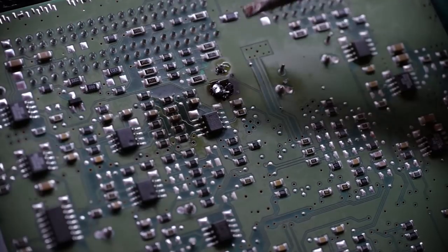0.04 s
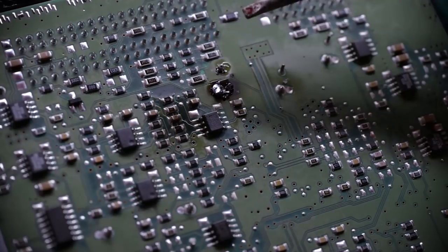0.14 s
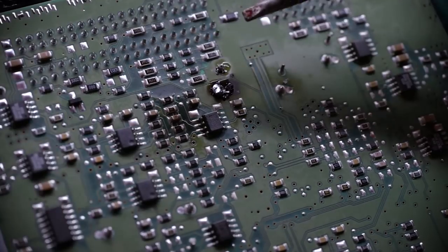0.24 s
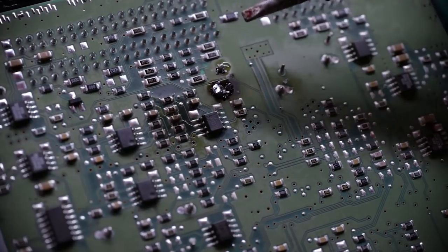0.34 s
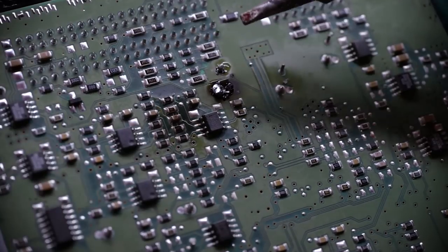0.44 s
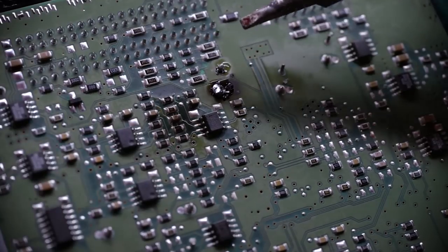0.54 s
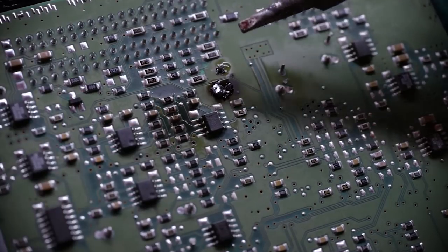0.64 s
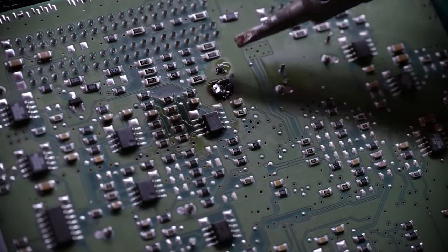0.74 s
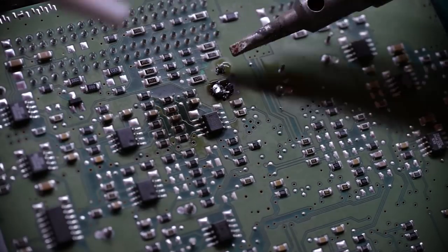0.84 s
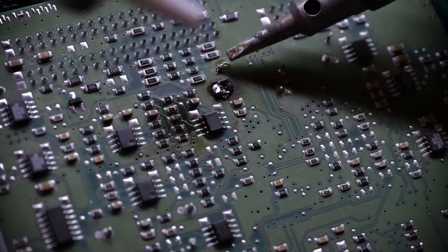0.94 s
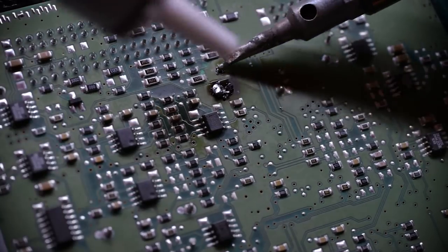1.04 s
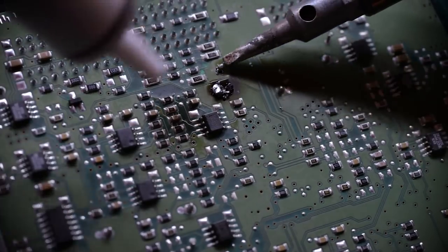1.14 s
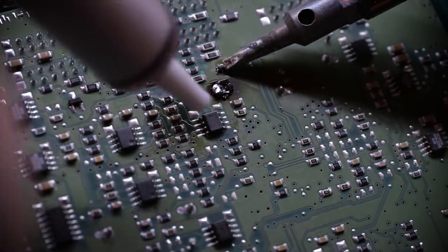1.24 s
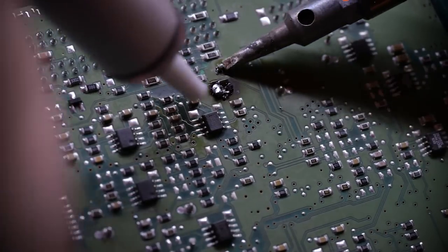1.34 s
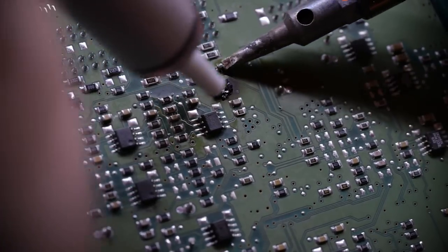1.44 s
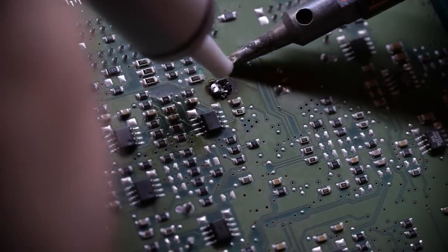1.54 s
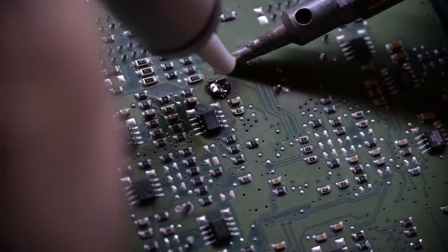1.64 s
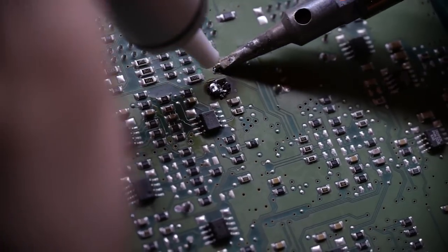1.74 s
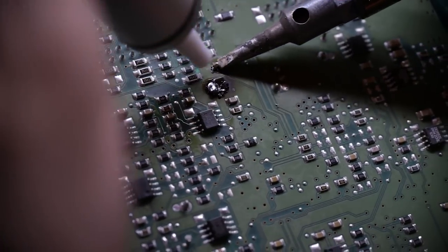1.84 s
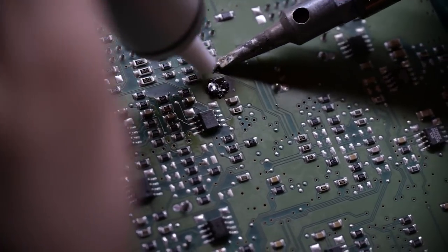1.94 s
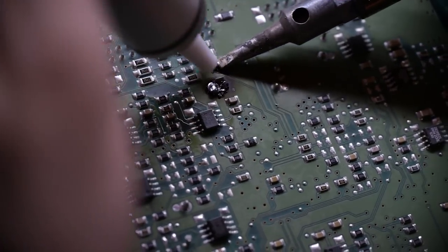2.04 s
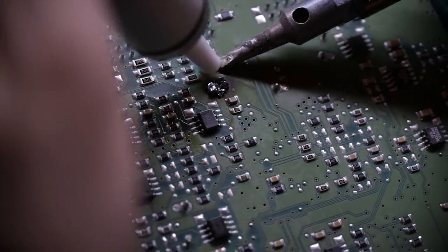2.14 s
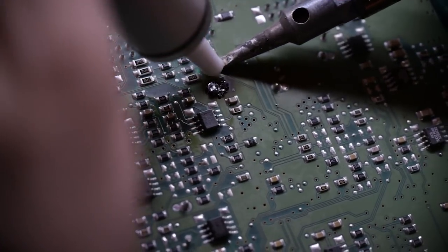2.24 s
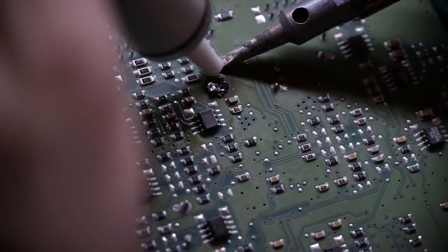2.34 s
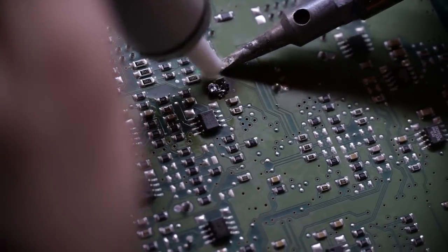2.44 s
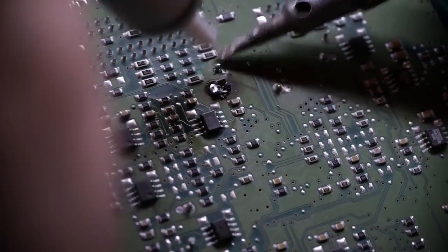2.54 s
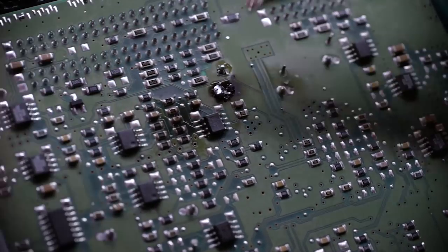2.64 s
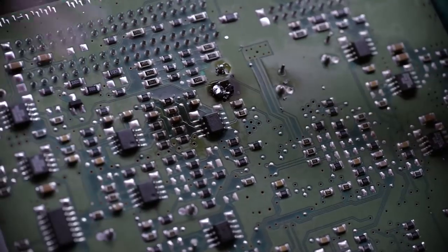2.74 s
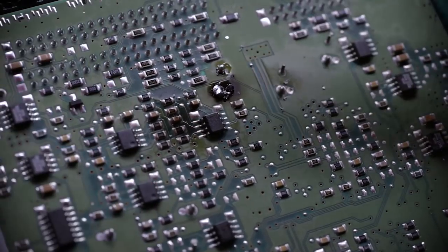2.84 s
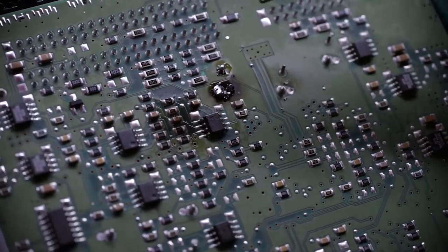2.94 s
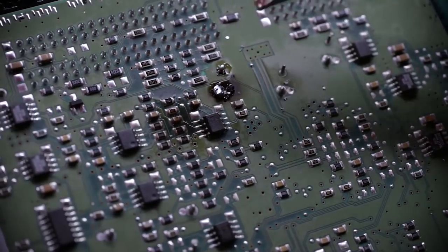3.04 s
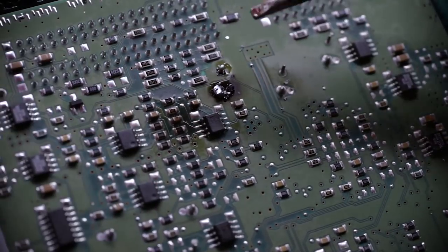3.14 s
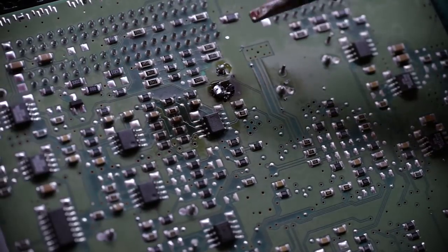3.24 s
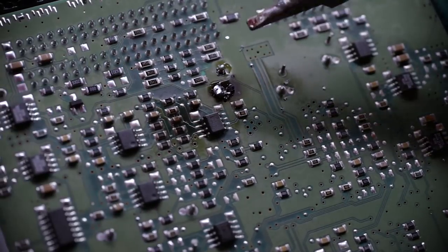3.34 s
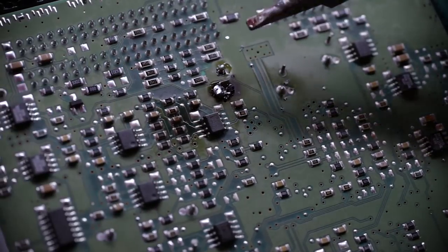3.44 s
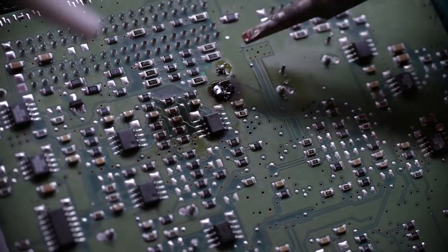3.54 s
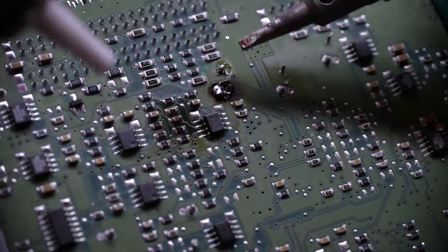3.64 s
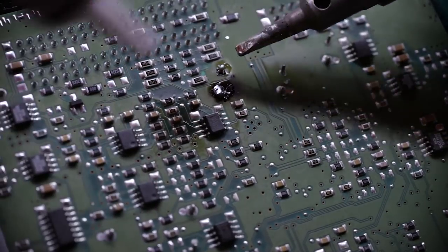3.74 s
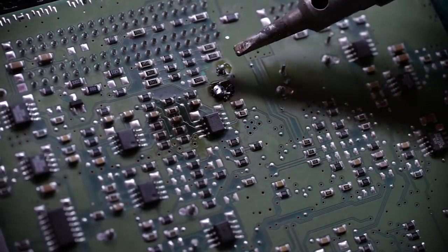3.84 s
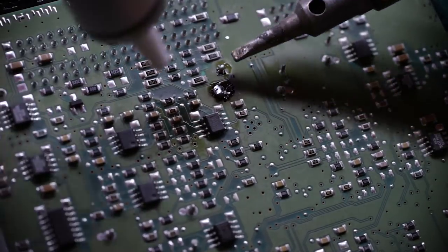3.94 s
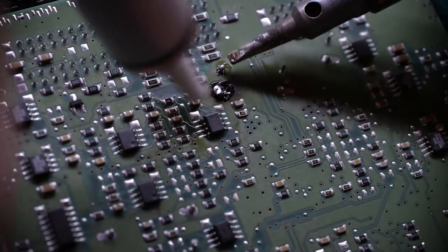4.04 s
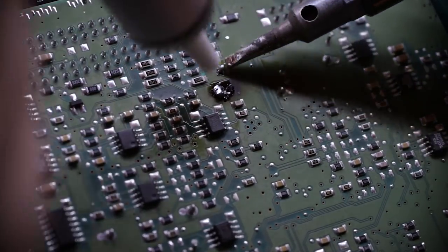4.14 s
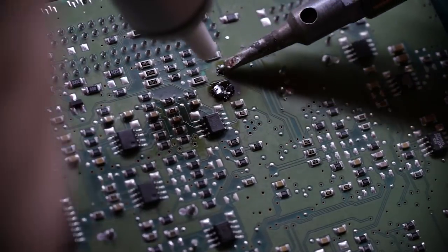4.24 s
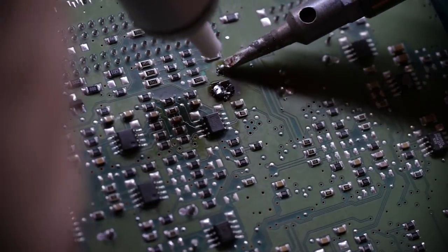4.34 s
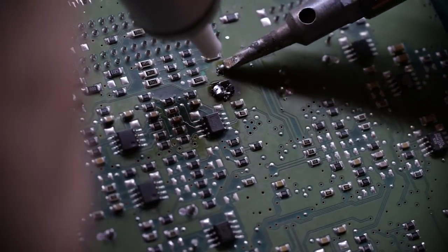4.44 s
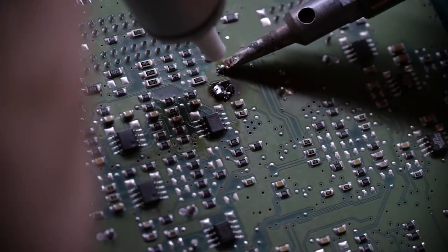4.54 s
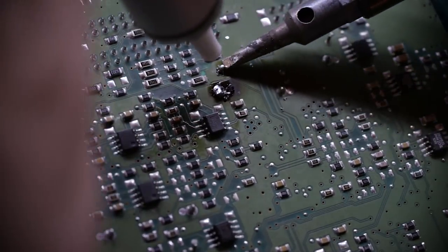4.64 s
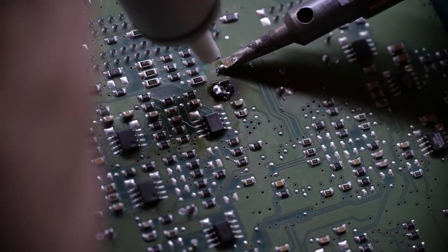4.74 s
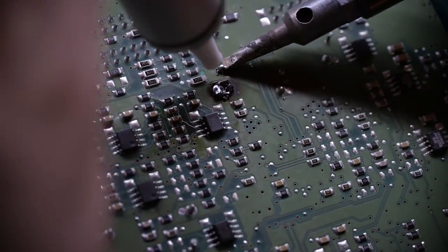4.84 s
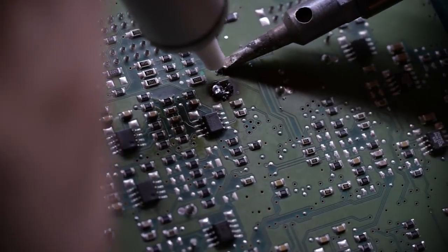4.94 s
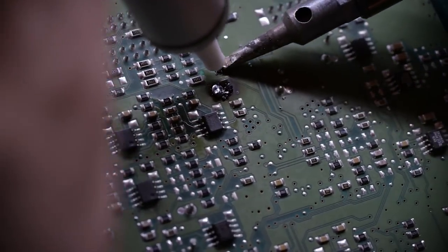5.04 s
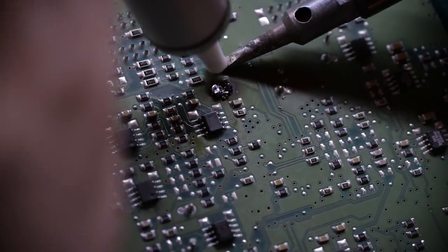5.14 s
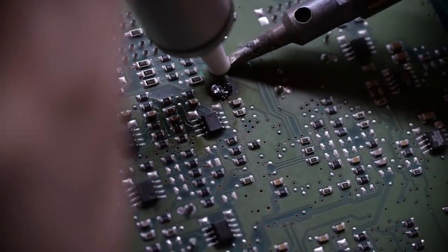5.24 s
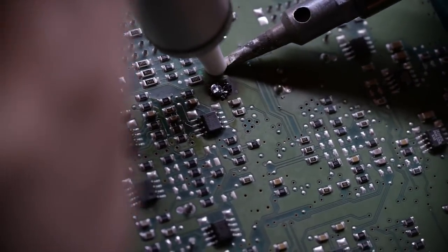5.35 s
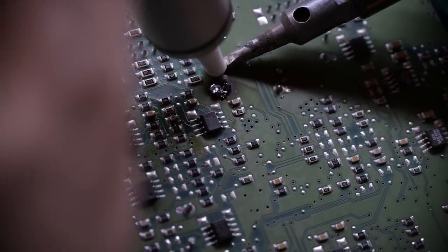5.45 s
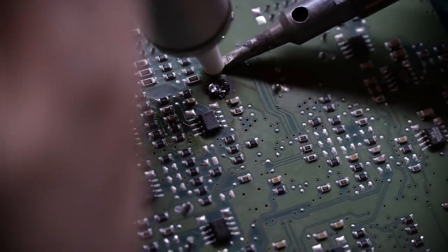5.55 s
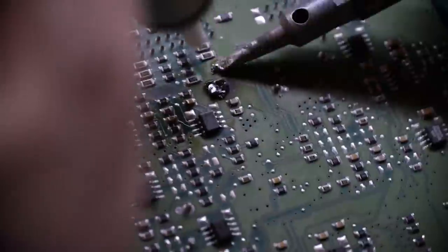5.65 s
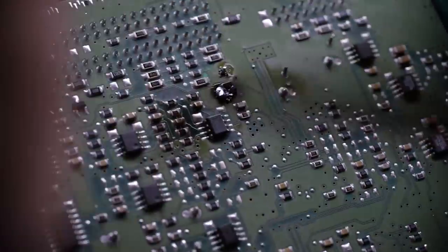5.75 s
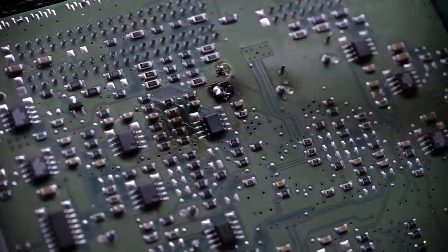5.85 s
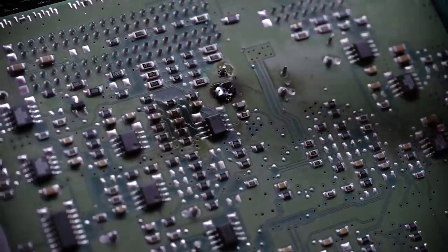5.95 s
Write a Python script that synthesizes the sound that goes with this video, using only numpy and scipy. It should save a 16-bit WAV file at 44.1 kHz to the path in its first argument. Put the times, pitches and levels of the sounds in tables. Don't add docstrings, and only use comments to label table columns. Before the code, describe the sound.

Very close to a spring-loaded solder sucker at a bench: the plunger scrapes down, a metal catch snaps in and the knob knocks back. A pause with tiny ticks, then a loud, crisp shot with a short metallic ring and rattle. It is cocked again with a squeakier stroke, and fired once more, softer and more ragged. Behind, a low engine hum slowly falls and a fan hisses quietly. Small, short room tail.

```python
import sys
import numpy as np
from scipy import signal
from scipy.fft import rfft
from scipy.io import wavfile
from scipy.ndimage import uniform_filter1d

SR = 44100
rng = np.random.default_rng(int(sys.argv[2]) if len(sys.argv) > 2 else 0)


def amplitude_ratio(level_db):
    exponent = np.asarray(level_db, float) / 20
    return 10 ** exponent


def to_wav(s):
    ch = np.atleast_2d(s).T
    pcm = np.round(np.clip(ch, -1, 1) * 32767)
    wavfile.write(sys.argv[1], SR, pcm.astype(np.int16))


N = 265080

# frequency in Hz, density in dB per Hz.
SCRAPE = [(240, -32), (400, -43), (1560, -19), (1930, -4.5), (2430, -11), (3020, 0.5), (3690, -9),
          (4050, -5.5), (4650, -8.5), (9920, -18), (15000, -20), (16000, -28)]
# frequency in Hz, level in dB, t60 in seconds.
CATCH_FIRST = [(1990, -3, 0.091), (2720, 5.5, 0.046), (3030, -7, 0.035), (3210, -5, .06),
               (4020, 5.5, 0.047), (4770, -8.5, .05), (5600, -9, 0.028), (5940, -9, .04), (6660, -6, 0.045)]
CATCH_SECOND = [(1983, -3, 0.062), (2128, -6, 0.07), (3005, -2, 0.04), (3310, 1.5, 0.042), (3500, -5, .03),
                (4060, -10, 0.035), (4380, -9, .05), (5270, -6, 0.045), (6180, -14, .05), (7500, -6, .05)]
GLINT_HZ = 14000


def evened(x):
    return x / np.sqrt(np.mean(x ** 2) + 1e-20)


def smoothed_noise(shape, size, passes=1):
    wander = rng.standard_normal(shape)
    for _ in range(passes):
        wander = uniform_filter1d(wander, size=size)
    return evened(wander)


def read(points, hz):
    f, value = np.transpose(points)
    return np.interp(np.log(hz + 1), np.log(f + 1), value)


def resonate(x, hz, width_hz):
    turn = np.exp(2j * np.pi * np.cumsum(hz * np.ones(len(x))) / SR)
    r = np.exp(-np.pi * width_hz / SR)
    return 2 * (turn * signal.lfilter([1 - r], [1, -r], x / turn + 1e-18)).real


def colour(points):
    hz = abs(np.fft.fftfreq(4096, 1 / SR))
    log_gain = np.log(amplitude_ratio(np.maximum(read(points, hz), -80)))
    taps = np.fft.ifft(np.exp(np.conj(signal.hilbert(log_gain)))).real[:2048]
    return taps / np.linalg.norm(taps)


def add(mix, s, sound):
    part = mix[round(s * SR):][:len(sound)]
    part += sound[:len(part)]


def rings(modes, rough=0.7):
    t = np.arange(SR // 4) / SR
    taps = np.zeros(len(t))
    for hz, db, t60 in modes:
        beat = 1 + rough * smoothed_noise(len(t), 180, passes=2)
        taps += amplitude_ratio(db - 60 * t / t60) * np.sin(2 * np.pi * hz * t) * beat
    return taps / np.linalg.norm(taps)


def burst(db, rise, t60, grit_db):
    t = np.arange(SR // 4) / SR
    swell = amplitude_ratio(db - 6 - 60 * np.maximum(t - rise, 0) / t60) * np.minimum(t / rise, 1) ** 2
    grit = rng.standard_normal(len(t)) * amplitude_ratio(grit_db * smoothed_noise(len(t), 30))
    return swell * grit * np.linalg.norm(swell) / np.linalg.norm(swell * grit)


def struck(rows, spectrum, modes, ring_db, grit_db):
    drive = np.zeros(N)
    for s, db, rise, t60 in rows:
        add(drive, s, burst(db, rise, t60, grit_db))
    power = uniform_filter1d(abs(rfft(drive)) ** 2, size=500)
    share_db = np.clip(-10 * np.log10(power / power.mean()), -6, 6)
    shared_modes = [(hz, db + share_db[round(hz * N / SR)], t60) for hz, db, t60 in modes]
    body = amplitude_ratio(ring_db) * rings(shared_modes)
    hz = np.fft.rfftfreq(N, 1 / SR)[::100]
    add(body, 0, colour(np.transpose([hz, read(spectrum, hz) + share_db[::100]])))
    return signal.oaconvolve(drive, body)[:N]


def tick(db, body_hz, tip_hz, tip_db, t60, sharpness=4.2):
    hit = burst(0, 0.0006, t60, grit_db=4.0)[:round(t60 * SR)]
    hit = np.append(hit, np.zeros(600))
    hit[4] += 2.5
    body, tip = (resonate(resonate(hit, hz, hz / sharpness), hz, hz / sharpness) for hz in (body_hz, tip_hz))
    return amplitude_ratio(db) * (body / abs(body).max() + amplitude_ratio(tip_db) * tip / abs(tip).max())


def noise(shape_db, patchy_db):
    hz = np.fft.rfftfreq(2048, 1 / SR)
    a, b, patches = rng.standard_normal((N // 512 + 5, len(hz), 3)).T
    patches = uniform_filter1d(uniform_filter1d(patches, size=20, axis=0), size=8, axis=1)
    z = (a + 1j * b) * amplitude_ratio(shape_db(hz)[:, None] + patchy_db * evened(patches))
    return evened(signal.istft(z, nperseg=2048, noverlap=1536)[1][:N])


def engine():
    # time in seconds, firing rate in Hz.
    speed = [(0, 22.98), (1, 22.58), (3.5, 20.89), (5, 20.27), (6.01, 20.01)]
    swells = {4: [(.58, -53, 0.11), (1.3, -47.5, 0.34), (1.7, -60, 0.2), (2.1, -51, 0.24),
              (2.55, -54, 0.24), (3.55, -43.5, 0.39), (4.35, -49, 0.37), (4.8, -52.5, 0.25),
              (5.3, -52, 0.35), (5.78, -49, .25)], 5: [(.45, -54.5, 0.41), (1.4, -56.5, 0.3),
              (2.05, -52.5, 0.25), (2.6, -63, 0.16), (3.3, -56, 0.32), (4.05, -56.5, 0.28),
              (5.8, -66.5, 0.17)], 7: [(.1, -68, .3), (.75, -63, 0.16), (1.3, -57, 0.14),
              (1.83, -59.5, 0.17), (2.4, -64.5, 0.17), (2.92, -59.5, 0.25), (3.6, -61, 0.31),
              (5.0, -66.5, 0.7), (5.8, -67, 0.25)], 8: [(.28, -54, 0.26), (.8, -58.5, .15),
              (1.55, -56, 0.35), (2.0, -64.5, 0.12), (2.7, -70.5, 0.35), (3.6, -68.5, 0.41),
              (4.3, -59, 0.32), (5.3, -69, 0.91)]}
    faint_orders = {3: [(3, -83, 3.5)], 6: [(1.1, -68.5, 0.91)], 9: [(.3, -67, 0.8), (1.5, -71, .5),
                    (2.05, -75, 0.17), (4.5, -79.5, 1.8)], 11: [(4.3, -88, 1)], 12: [(1.9, -74, 0.74),
                    (3.1, -77, 0.26), (4.1, -78, 0.66)]}
    motors = {81: [(.3, -60, 1.05)], 116: [(3.7, -90, 1)]}
    null_order, null_s, null_width_s = 4, 1.857, 0.24
    flutter_db = 1.05
    t = np.arange(N) / SR
    turns = 2 * np.pi * np.cumsum(np.interp(t, *np.transpose(speed))) / SR
    lines = [(order * turns, rows) for order, rows in {**swells, **faint_orders}.items()]
    lines += [(2 * np.pi * hz * t, rows) for hz, rows in motors.items()]
    out = np.zeros(N)
    for angle, rows in lines:
        level = sum(amplitude_ratio(db) / 2 ** (((t - s) / width) ** 2) for s, db, width in rows)
        if rows is swells[null_order]:
            level = level * np.tanh((t - null_s) / null_width_s)
        level = level * amplitude_ratio(flutter_db * smoothed_noise(N, 3000, passes=2))
        out += np.sqrt(2) * level * np.cos(angle + 2 * np.pi * rng.random())
    return out


def housing(hz):
    # frequency in Hz, density in dB per Hz.
    trend = [(180, -15), (300, -6.5), (420, -1), (671, -4.5), (793, -3.5), (1070, -4.5), (1290, -7),
             (1830, -11), (2930, -2.5), (4030, -8), (4770, -13.5), (6240, -15), (7500, -6.5), (14000, -23),
             (15200, -28), (16500, -71)]
    # frequency in Hz, width in Hz, lift in dB.
    resonances = [(777, 43, 8), (2580, 110, 1.5), (3040, 140, -1), (3470, 150, 4), (4050, 180, -4),
                  (4430, 310, 2), (4870, 280, 7.5), (7500, 350, 1.5), (8670, 260, -12), (8860, 330, 8.5),
                  (9440, 110, -5), (10600, 430, 1), (11300, 600, 2), (12400, 2400, -4.5)]
    ripple_db = 1.3 * smoothed_noise(len(hz), 4) * np.minimum(hz / 4000, 1)
    lifts = sum(db / (1 + (2 * (hz - f) / width) ** 2) for f, width, db in resonances)
    return read(trend, np.minimum(hz, 15000.)) + lifts + ripple_db


def fan():
    # frequency in Hz, density in dB per Hz.
    rumble_shape = [(15, -56), (45, -28), (80, -0.5), (105, 3), (130, -1.5), (170, -5), (215, -9.5),
                    (300, -22.5), (420, -19), (900, -89)]
    # time in seconds, level in dB.
    whine_level = [(0, -72.5), (2.4, -76), (6.01, -87.5)]
    hiss_db, rumble_db, rumble_fade_db_per_s = -66, -64.5, 0.87
    t = np.arange(N) / SR
    hiss = noise(housing, patchy_db=1.15)
    rumble = noise(lambda hz: read(rumble_shape, hz), patchy_db=1.0)
    whine = evened(resonate(rng.standard_normal(N), hz=932., width_hz=26.))
    out = amplitude_ratio(hiss_db) * hiss
    out += amplitude_ratio(rumble_db - rumble_fade_db_per_s * t) * rumble
    return out + amplitude_ratio(np.interp(t, *np.transpose(whine_level))) * whine


def touches():
    # start in seconds, board level in dB, tip over board in dB, t60 in seconds.
    contacts = [(0.1464, -50.5, -5.5, 0.012), (0.15, -55, 1, .03), (1.6315, -54.5, 1, 0.015),
                (2.773, -40.5, -5.5, 0.018), (2.8277, -63.5, 12, 0.0091), (2.8509, -64, 10, .05),
                (2.9776, -49, 7.5, 0.0047), (2.997, -61, 6, .0069), (3.021, -67, 0, .01),
                (3.2917, -54, 1, 0.06), (3.2967, -56, 0, .03), (5.2744, -61, 4, .015),
                (5.4298, -51.5, -1, 0.0091), (5.5918, -48.5, 1, 0.0079), (5.979, -60, 3, 0.017),
                (6.003, -48.5, -4, .019)]
    board_hz, nozzle_hz = 3200, 5160
    out = np.zeros(N)
    for s, db, tip_db, t60 in contacts:
        add(out, s, tick(db, board_hz, nozzle_hz, tip_db, t60, sharpness=1.9))
    return out


def loose_parts():
    # start in seconds, peak in dB, body frequency in Hz, t60 in seconds.
    metal = [(.2763, -54.5, 5970, 0.011), (1.168, -58, 3420, .015), (1.26, -60, 6070, .015),
             (1.303, -60, 4100, .015), (1.4355, -55.5, 4030, .008), (1.4415, -58, 3200, .01),
             (3.3432, -48.5, 4500, .035), (3.35, -51.5, 3600, .06), (4.396, -62, 4200, .04),
             (5.887, -38.5, 2900, 0.013), (2.7735, -53.5, 2650, 0.045), (.532, -54, 7500, 0.022),
             (3.345, -58.5, 1700, .033)]
    # start in seconds, peak in dB, body frequency in Hz, t60 in seconds.
    glints = [
        (2.5342, -21.5, 12900, 0.02),
        (4.397, -68, 12000, .04),
        (.1462, -64, 10000, .006),
        (.277, -69, 11000, .006),
        (.67, -56, 12500, .08),
        (2.7728, -59, 7850, 0.087),
        (5.591, -56, 10500, .008),
        (5.8872, -47, 4760, 0.0074),
    ]
    # start in seconds, peak in dB, body frequency in Hz, t60 in seconds.
    rod = [
        (.5307, -41, 3800, 0.035),
        (.585, -61, 4200, .05),
        (.6285, -56, 3700, .04),
        (.654, -52, 4200, .07),
        (.553, -59, 2500, .04),
        (3.538, -54, 4600, .04),
    ]
    out = np.zeros(N)
    for rows, tip_hz, tip_db in ((metal, 10000, -4.5), (glints, GLINT_HZ, -1), (rod, 3050, -3)):
        for s, db, hz, t60 in rows:
            add(out, s, tick(db, hz, tip_hz, tip_db, t60))
    return out


def pings():
    # start in seconds, peak in dB, frequency in
    # Hz, t60 in seconds.
    short_tones = [(.531, -52, 4180, .06), (3.438, -46, 3050, .04), (5.706, -42, 4050, .05),
                   (5.72, -35, 4150, 0.049), (2.5344, -23.5, 4320, .03), (2.552, -40, 8100, .02),
                   (2.563, -35, 8040, .025), (2.593, -44, 8060, 0.032), (2.605, -48, 8060, .03),
                   (2.607, -54, 6470, .06), (2.619, -46, 8060, 0.031), (2.717, -60, 8060, .03),
                   (5.734, -30, 6350, 0.035), (5.749, -44, 8050, 0.059), (5.771, -54.5, 6350, .05),
                   (5.789, -46, 8050, .025), (5.794, -52, 6360, 0.036), (5.802, -51, 8000, .025),
                   (5.812, -58, 6330, .04)]
    # start in seconds, peak in dB, frequency in Hz, t60 in seconds.
    bench = [
        (1.4353, -48, 397, .025),
        (1.4355, -58, 560, .015),
        (2.534, -45, 254, 0.16),
        (2.534, -51, 220, 0.12),
        (2.537, -42, 560, 0.063),
        (3.428, -53, 207, 0.11),
        (3.431, -54.5, 253, 0.13),
        (5.716, -42.5, 258, 0.17),
        (5.717, -51, 221, 0.13),
    ]
    out, t = np.zeros(N), np.arange(SR // 6) / SR
    for s, db, hz, t60 in short_tones + bench:
        add(out, s, amplitude_ratio(db - 60 * t / t60) * np.minimum(t / 0.0004, 1) * np.sin(2 * np.pi * hz * t))
    return out


def slide(start, length, rub_db, from_hz, to_hz, squeak_db, swell_db):
    # frequency in Hz, width in Hz, lift in dB.
    groove = [(2540, 250, 0), (3050, 750, -6), (4150, 140, 2.5), (6800, 540, -15)]
    rise_s, fall_s, edge_floor_db = 0.015, 0.032, -30
    t = np.arange(0, length, 1 / SR)
    pressure = (t / length) ** 2
    fade = np.maximum(1 - t / rise_s, 1 - (length - t) / fall_s)
    edge_db = edge_floor_db * np.maximum(fade, 0)
    rub, leak = rng.standard_normal((2, len(t)))
    rub = rub * amplitude_ratio(2.5 * smoothed_noise(len(t), 150))
    wall = sum(amplitude_ratio(lift_db) * evened(resonate(rub, hz, width)) for hz, width, lift_db in groove)
    rubbed = evened(signal.oaconvolve(rub, colour(SCRAPE))[:len(t)] + amplitude_ratio(-4.0) * wall)
    squeak = evened(resonate(leak, from_hz + (to_hz - from_hz) * pressure, 1800.))
    squeak_level_db = squeak_db - swell_db * (2.5 - np.sqrt(pressure))
    return start, amplitude_ratio(edge_db) * (amplitude_ratio(rub_db) * rubbed + amplitude_ratio(squeak_level_db) * squeak)


def slides():
    # (sounds 25 dB lower at the start, 15 dB lower at the end).
    strokes = [
        (0.535, 0.21, -64, 9000, -69),
        (3.289, .145, -64, 10800, -53),
    ]
    # start in seconds, length in seconds, rub level in dB, squeak level in dB.
    grips = [
        (2.737, 0.36, -97, -81),
        (5.858, 0.17, -68.5, -77),
    ]
    top_hz, rest_hz = 14500, 11500
    out = np.zeros(N)
    for s, length, db, hz, squeak_db in strokes:
        add(out, *slide(s, length, db, hz, top_hz, squeak_db, swell_db=10))
    for s, length, db, squeak_db in grips:
        add(out, *slide(s, length, db, rest_hz, rest_hz, squeak_db, swell_db=0))
    return out


def latches():
    # start in seconds, peak in dB, rise in seconds, t60 in seconds.
    first = [
        (.7045, -46, 0.002, 0.15),
        (.709, -44, 0.004, 0.28),
        (.7155, -32, 0.0016, 0.054),
        (.722, -37.5, 0.0025, 0.099),
        (.737, -48, .003, 0.12),
    ]
    # start in seconds, peak in dB, rise in seconds, t60 in seconds.
    second = [
        (3.423, -45, 0.0013, 0.13),
        (3.428, -40, 0.0047, 0.23),
        (3.4345, -34, 0.0018, .04),
        (3.4395, -34, 0.0016, 0.047),
        (3.452, -49, 0.0038, 0.15),
    ]
    out = struck(first, SCRAPE, CATCH_FIRST, ring_db=-1.0, grit_db=4.0)
    return out + struck(second, SCRAPE, CATCH_SECOND, ring_db=-3.5, grit_db=-2.0)


def thumps():
    # start in seconds, peak in dB, frequency in Hz, t60 in seconds.
    knocks = [(1.434, -58, 380, 0.014), (1.441, -59, 490, 0.0099), (2.534, -49, 110, .06),
              (2.537, -41.5, 436, 0.018), (2.535, -48, 824, .025), (3.423, -57, 120, 0.069),
              (3.545, -65, 290, 0.025), (0.78, -66, 335, 0.018), (.72, -64, 340, 0.045),
              (4.27, -64, 360, 0.034), (5.695, -51.5, 235, 0.033), (5.713, -49, 271, 0.032),
              (5.724, -48, 930, 0.06), (5.721, -57, 110, 0.11), (2.536, -47, 1040, 0.05)]
    out = np.zeros(N)
    for s, db, hz, t60 in knocks:
        add(out, s, tick(db, hz, 1.433 * hz, tip_db=-3, t60=t60, sharpness=5.1))
    return out


def stops():
    # start in seconds, peak in dB, rise in seconds, t60 in seconds.
    first = [
        (.82, -40.5, 0.0041, 0.062),
        (.825, -31, 0.001, 0.024),
        (.8283, -29, 0.00084, 0.026),
        (.833, -41, 0.0017, 0.049),
        (.84, -52, 0.0032, 0.12),
    ]
    # start in seconds, peak in dB, rise in seconds, t60 in seconds.
    second = [
        (3.536, -41, 0.0093, 0.076),
        (3.5475, -33.5, .0015, 0.032),
        (3.551, -40.5, 0.0018, 0.053),
        (3.56, -50.5, 0.0046, 0.094),
    ]
    # frequency in Hz, density in dB per Hz.
    knock_first = [(180, -30), (300, -9.5), (842, -7), (1190, -18), (1560, -9.5), (2030, -11.5), (4090, -6),
                   (4440, -10.5), (5700, -11), (7320, -19), (9240, -19.5), (16000, -26)]
    knock_second = [(180, -26), (300, -7), (701, -6), (856, -4.5), (1190, -13), (1720, -14), (2210, -6.5),
                    (3190, -9), (3890, -3.5), (5610, -15), (15000, -23), (16000, -24)]
    out = struck(first, knock_first, CATCH_FIRST, ring_db=-14, grit_db=1.5)
    return out + struck(second, knock_second, CATCH_SECOND, ring_db=-17, grit_db=4.0)


def shots():
    # start in seconds, peak in dB, rise in seconds, t60 in seconds.
    clean = [
        (2.52, -45, 0.0031, 0.055),
        (2.5235, -31, 0.0017, 0.17),
        (2.5338, -12, 0.00045, 0.016),
        (2.5362, -17, 0.00059, 0.068),
        (2.55, -43.5, 0.0079, 0.37),
        (2.554, -33, 0.00064, 0.026),
        (2.564, -34, .001, 0.011),
    ]
    # start in seconds, peak in dB, rise in seconds, t60 in seconds.
    clogged = [(5.704, -49, 0.0025, 0.039), (5.7065, -34, 0.0041, 0.21), (5.7105, -43, .001, 0.048),
               (5.7172, -26.5, 0.00071, 0.015), (5.7205, -30, 0.0033, 0.048), (5.7235, -26, 0.00053, 0.039),
               (5.726, -20.5, 0.00081, 0.041), (5.7285, -21.5, 0.0011, 0.032), (5.7325, -31, 0.00092, 0.08),
               (5.739, -33, .002, 0.055), (5.748, -38, .004, 0.12), (5.76, -44, 0.0023, 0.046),
               (5.74, -45, .005, 0.52)]
    # frequency in Hz, density in dB per Hz.
    clean_shape = [(180, -19.5), (300, -4), (574, -5), (700, -9.5), (950, -6), (1410, -15), (1560, -6.5),
                   (2210, -3.5), (2650, -4.5), (2880, 2), (3700, -2), (4020, 3.5), (5160, -2), (6410, -3),
                   (8640, -5), (13100, -7.5), (16000, -33)]
    clogged_shape = [(180, -19), (300, -7), (520, -5.5), (656, -9.5), (856, -8), (1250, -12.5), (1390, -15),
                     (1580, -6.5), (2840, -0.5), (3580, -0.5), (4910, -0.5), (5250, -3.5), (6410, -2.5),
                     (9550, -9.5), (13300, -5), (16000, -25)]
    # frequency in Hz, level in dB, t60 in seconds.
    barrel = [(2180, 3, 0.11), (2830, -13.5, 0.065), (3120, 8, 0.093), (3370, -5, 0.087),
              (3800, -17, 0.038), (4160, 1, 0.08), (4370, 4, 0.024), (4600, 1, 0.071), (5600, 3, 0.04),
              (6300, 0, 0.088), (7800, -11, 0.055), (11000, -1, 0.05), (12000, -4, 0.05), (13000, 3, .07)]
    out = struck(clean, clean_shape, barrel, ring_db=-11, grit_db=1.5)
    return out + struck(clogged, clogged_shape, barrel, ring_db=-10.5, grit_db=0.5)


def tremble():
    # start in seconds, peak in dB, rise in seconds, t60 in seconds.
    shakes = [
        (2.575, -51, .01, .15),
        (2.598, -51, .003, .12),
        (2.62, -53, .008, 0.18),
        (2.645, -55.5, .01, .25),
        (2.675, -63, .008, .15),
        (2.72, -63, 0.011, .15),
        (5.77, -55, .01, 0.17),
        (5.8, -64, .01, .25),
    ]
    # frequency in Hz, level in dB, t60 in seconds.
    rod_modes = [(2780, -9, .04), (3230, -7, .06), (3480, -2, .06), (3850, -8, .03), (4180, -2, .04),
                 (4290, -1, .04), (4500, -2, .03), (4720, -5, .05), (4910, -9, .04), (5200, -8, .04),
                 (6350, -10, .05)]
    return struck(shakes, SCRAPE, rod_modes, ring_db=2.5, grit_db=5.0)


def settling_coil():
    end_s, last_gap_s, shrink = 2.761, .0135, .89
    out = np.zeros(N)
    for s in end_s - np.cumsum(last_gap_s * shrink ** np.arange(12)):
        add(out, s, tick(-66, 12800, GLINT_HZ, tip_db=-6, t60=.008, sharpness=6.5))
    return out


def room(x, gap_s=0.0036):
    # frequency in Hz, t60 in seconds.
    decay = [(200, 0.57), (1000, 0.38), (3500, 0.26), (8000, 0.22), (14000, 0.22)]
    taps = np.zeros(SR // 2)
    at = np.arange(round(gap_s * SR), SR // 2 - 20, 12)
    taps[at + rng.integers(0, 12, len(at))] = rng.choice([-1., 1.], len(at))
    hz, t, z = signal.stft(taps, SR, nperseg=256)
    tail = signal.istft(z * amplitude_ratio(-60 * t / read(decay, hz)[:, None]), SR, nperseg=256)[1]
    return signal.fftconvolve(x, tail / np.linalg.norm(tail))[:N]


def scene():
    tool = touches() + loose_parts() + pings() + slides() + latches() + thumps()
    tool += stops() + shots() + tremble() + settling_coil()
    return (tool + amplitude_ratio(-14.5) * room(tool) + engine() + fan())[None]


def low_pass(x):
    return signal.sosfilt(signal.butter(12, 16670, fs=SR, output="sos"), x)


def record(dry):
    edge_hz, top_hz, open_db, shut_db = 15760, 16620, -58., -30.
    wide, narrow = (signal.oaconvolve(dry, signal.firwin(1023, hz, fs=SR)[None], "same")
                    for hz in (top_hz, edge_hz))
    top = wide - narrow
    level_db = 10 * np.log10(abs(uniform_filter1d(top ** 2, size=400)) + 1e-14)
    gate = amplitude_ratio(np.clip(3 * (level_db - open_db), shut_db, 0))
    return low_pass(narrow + gate * top)


dry = scene()
out = record(dry)
to_wav(out)
```